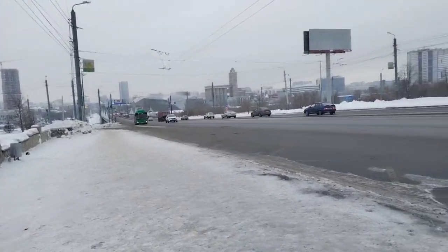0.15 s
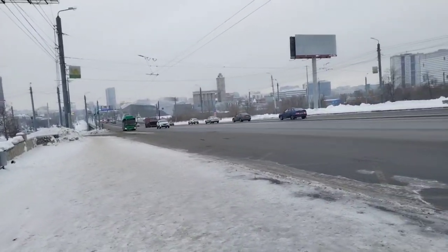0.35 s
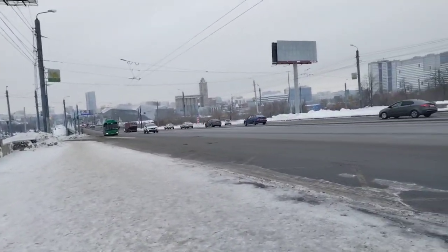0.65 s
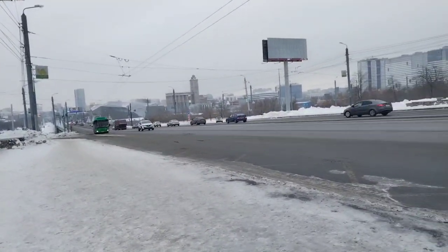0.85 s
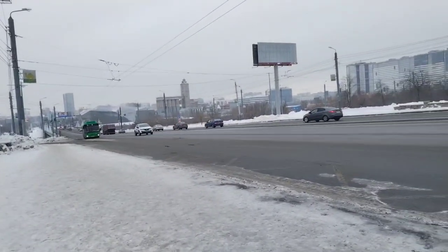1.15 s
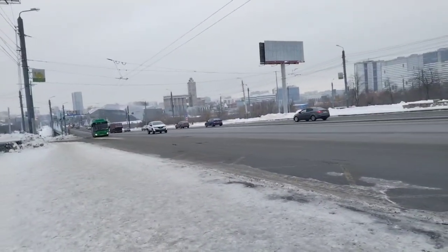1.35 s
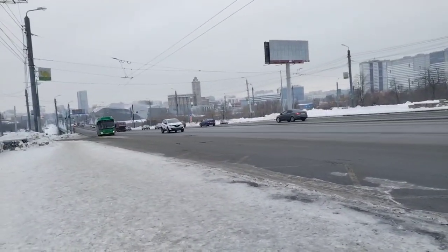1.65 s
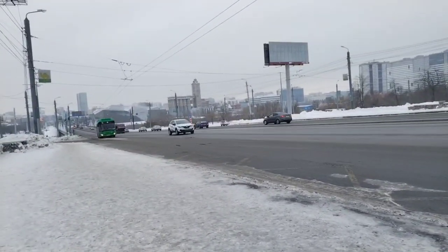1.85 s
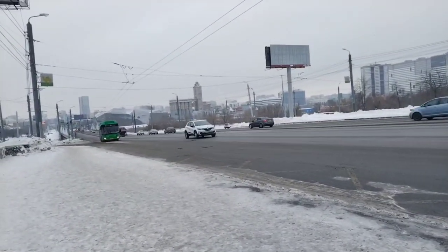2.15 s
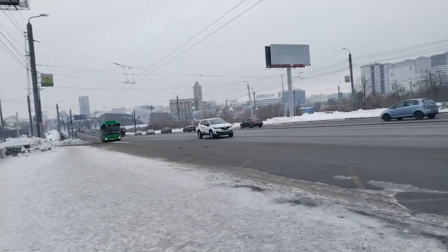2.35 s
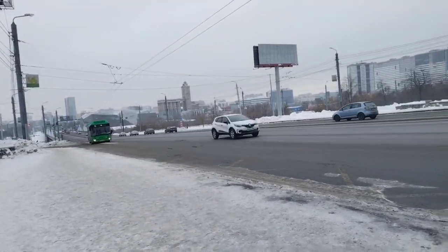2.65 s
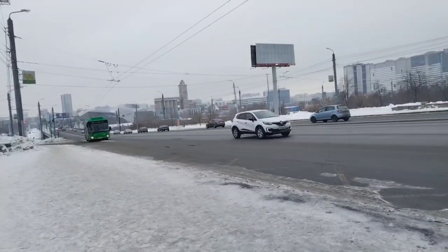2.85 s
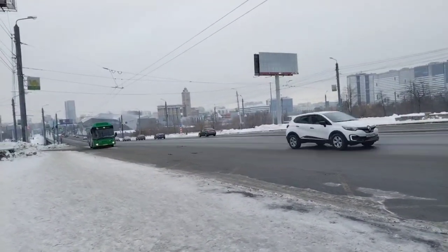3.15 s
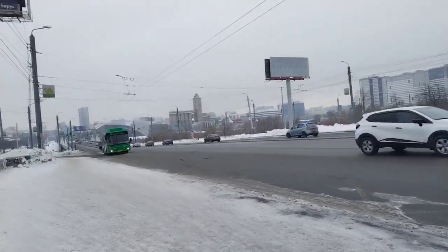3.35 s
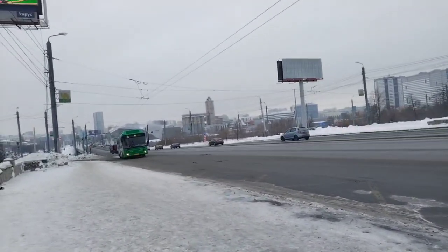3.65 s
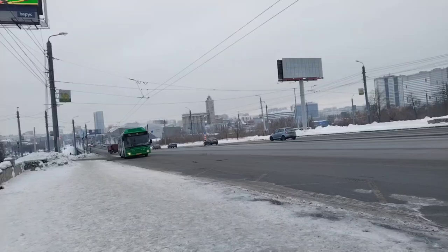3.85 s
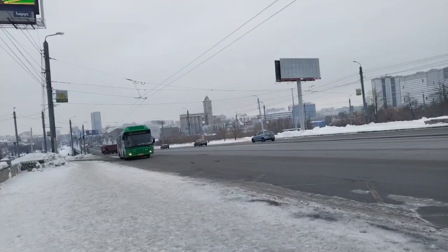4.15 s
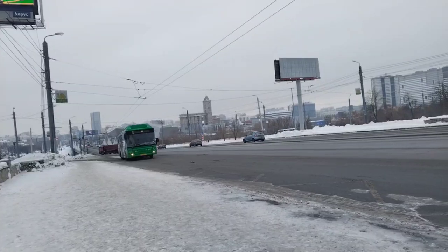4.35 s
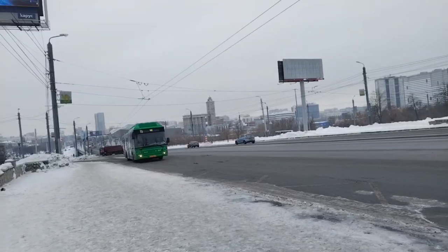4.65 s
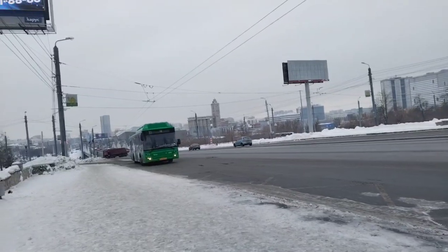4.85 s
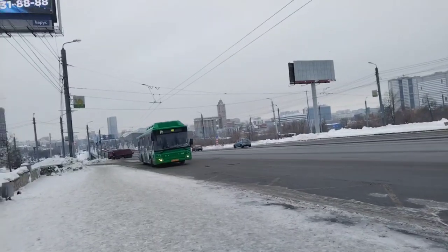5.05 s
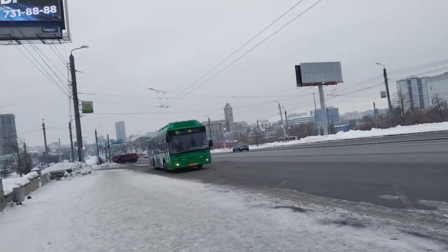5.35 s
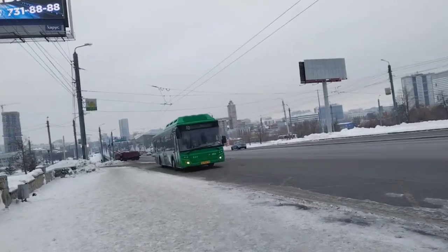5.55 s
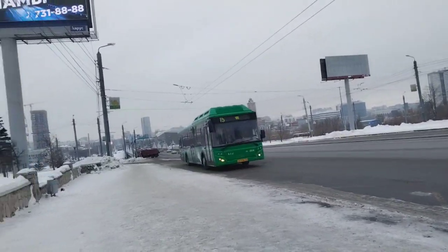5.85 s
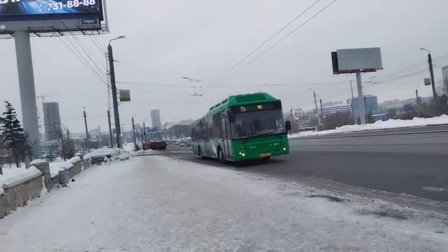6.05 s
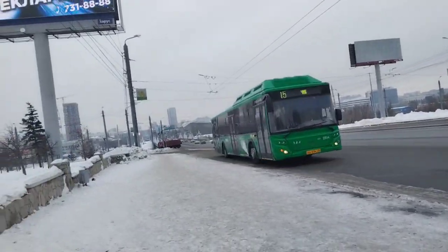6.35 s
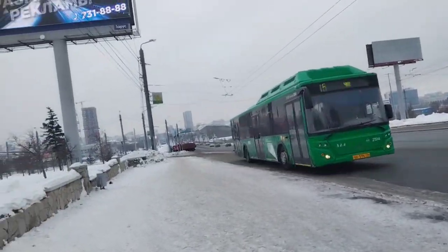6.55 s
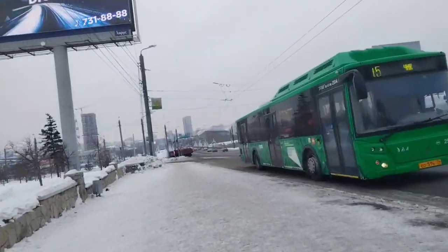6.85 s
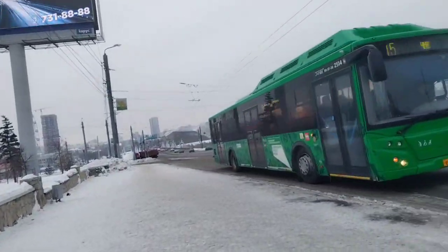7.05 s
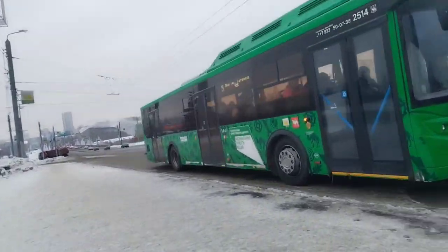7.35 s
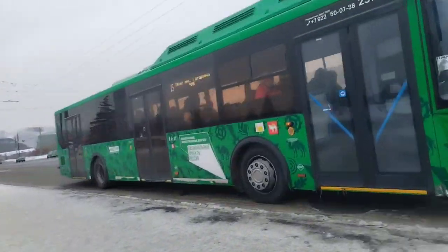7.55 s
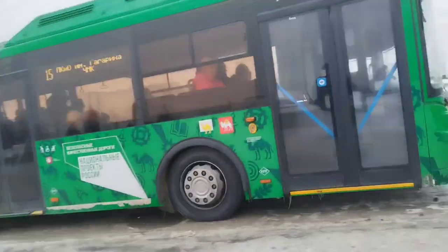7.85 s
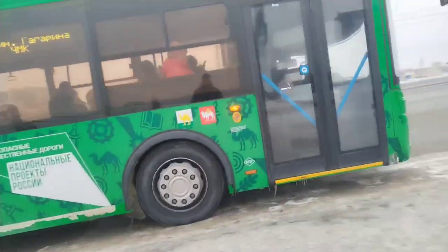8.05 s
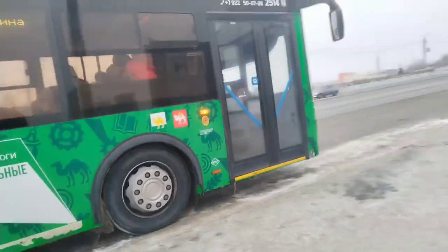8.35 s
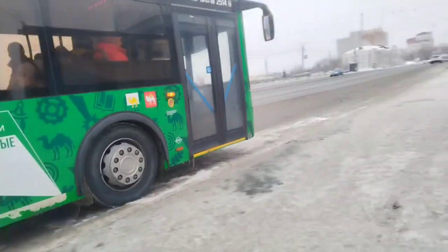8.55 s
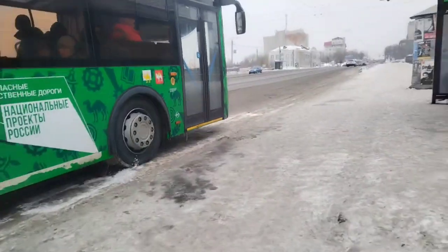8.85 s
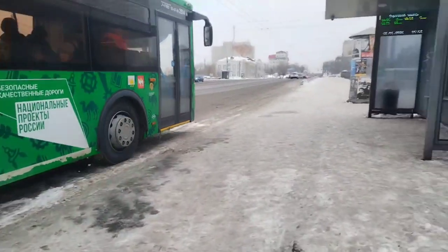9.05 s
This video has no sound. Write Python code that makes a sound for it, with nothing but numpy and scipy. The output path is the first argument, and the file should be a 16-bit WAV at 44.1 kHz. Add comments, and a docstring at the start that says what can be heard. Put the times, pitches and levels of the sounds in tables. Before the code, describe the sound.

Steady traffic hum with low exhaust drone, and tyres hissing on slush. Cars swell and fade, the strongest rush coming near four seconds with snapping grit. The road calms a little while a bus approaches with a wavering hum and diesel rumble; it rolls past very close, slowing, its note falling, with raspy high brake squeals, short chirps, a hidden car's rush behind it and soft air buffets. Open roadside, handheld stereo camera that turns to follow.

```python
"""A car passes at once on a wide, slushy winter road, over a hum of engines and the hiss of wet tyres.
More cars follow and one sweeps past close by: shaped noise makes tyre roar and spray, clicks make grit.
Then a city bus rolls past: wavering tones make its sinking drive note, and tones roughened by noise
its squealing brakes. All is heard from the pavement through the two ports of a hand-held camera."""
import sys
import numpy as np
from scipy import signal
from scipy.fft import rfft, irfft
from scipy.io import wavfile
from scipy.ndimage import uniform_filter1d

SR = 44100
rng = np.random.default_rng(int(sys.argv[2]) if len(sys.argv) > 2 else 0)


def wav_record(signal):
    """Record a signal, one row per channel, as 16-bit PCM in the file named by sys.argv[1]."""
    frames = np.transpose(np.atleast_2d(signal))
    bounded = np.clip(frames, -1, 1)
    # unit amplitude maps onto the largest positive 16-bit level
    quanta = np.round(bounded * 32767).astype(np.int16)
    wavfile.write(sys.argv[1], SR, quanta)


N = 405279
TIME = np.arange(N) / SR
FRAME_S = np.arange(N // 512 + 5) * 512 / SR  # times of the short noise frames
BIN_HZ = np.fft.rfftfreq(2048, 1 / SR)  # pitches within one frame
FINE_HZ = np.fft.rfftfreq(N, 1 / SR)


def amp(db):
    """Decibels to gain."""
    return 10 ** (np.asarray(db) / 20)


def evened(x):
    """Scales to an rms of 1."""
    return x / np.sqrt(np.mean(abs(x) ** 2) + 1e-20)


def read(points, hz, axis=1):
    """One column of a spectrum, joined on a log-frequency axis."""
    table = np.transpose(points)
    return np.interp(np.log(hz + 1), np.log(table[0] + 1), table[axis])


def follow(rows, t):
    """The columns of a curve, read at t."""
    s, *columns = np.transpose(rows)
    return [np.interp(t, s, c) for c in columns]


def shape(points):
    """A spectrum as gains of unit power."""
    return evened(amp(read(points, BIN_HZ)))


def held(t, start, end, rise_s, fall_s):
    """An envelope that grows exponentially up to start, holds until end and dies away."""
    return np.exp(-np.maximum(start - t, 0) / rise_s - np.maximum(t - end, 0) / fall_s)


def flutter(width_hz):
    """Complex noise that wanders within a band of about this width around zero."""
    rate = 3000  # points per second, enough for slow wandering
    hz = np.fft.fftfreq(32768, 1 / rate)
    noise = rng.standard_normal(len(hz)) + 1j * rng.standard_normal(len(hz))
    slow = np.fft.ifft(noise / (1 + (2 * hz / width_hz) ** 2) ** 1.25)
    return evened(np.interp(TIME, np.arange(len(hz)) / rate, slow))


# Bass bends the long way round the camera body.
# Each row: pitch in Hz, stretch of the lag between the ports as a factor.
DETOUR = [(400, 1.17), (800, 1.05), (1300, 1), (1700, 1.005), (3000, 1.02)]


def port_noise(size, likeness, lag_ms=0):
    """Noise at both ports, sized by frame and pitch; the share in common reaches the left port late."""
    a, b, c, d = rng.standard_normal((4, len(FRAME_S), len(BIN_HZ)))
    likeness = np.clip(likeness, -1, 1)
    right = a + 1j * b
    lag_ms = lag_ms * read(DETOUR, BIN_HZ)
    delayed = right * np.exp(-2j * np.pi * BIN_HZ * lag_ms / 1000)
    left = likeness * delayed + np.sqrt(1 - likeness ** 2) * (c + 1j * d)
    field = (np.array([left, right]) * size).swapaxes(1, 2)
    return signal.istft(field, nperseg=2048, noverlap=1536)[1][:, :N] / np.sqrt(2048 / 3)


# How a sound reaches the ports. Each row: degrees to the right of where the camera points,
# lag of the left port in ms before the bass stretch, shade on the left port 0-1 (negative: on the right).
BEARINGS = [(-72, -0.58, -0.36), (-5, -0.0067, 1), (5.5, -0.024, -0.24), (20.5, 0.2, 0.085),
            (31, 0.31, -0.092), (48, 0.48, 0.37), (70.5, 0.59, 0.57), (112, 0.68, 0.91), (159, 0.65, 1)]


def at_ports(bearing):
    """Lag in ms and shade between the ports for a bearing in radians."""
    return follow(BEARINGS, np.degrees(bearing))


# Shadow of the camera body. Each row: pitch in Hz, dB in favour of the right port in full shade.
SHADOW = [(150, 0), (400, 10), (1000, 5.5), (2000, 5), (3300, 19), (5000, 37), (7000, 19), (9000, 16),
          (14000, 42)]


def shaded(shade, notch_hz=2080, notch_sag_hz=290, notch_width_hz=200, notch_db=-6):
    """Gains of both ports: the body screens the left; its reflection notches the right, lower in deep shade."""
    shadow = amp(read(SHADOW, BIN_HZ) * shade)
    away = (BIN_HZ - notch_hz + notch_sag_hz * shade) / notch_width_hz
    notch = amp(notch_db * np.clip(0.63 + shade, 0, 1) / (1 + away ** 2))
    return np.array([np.ones_like(shadow), shadow * notch]) * np.sqrt(2 / (1 + shadow ** 2))


# Where the camera points as it swings round to follow the bus.
# Each row: time in seconds, degrees from the oncoming traffic.
HEADING = [(0, 18), (2.7, 28), (5.5, 33), (7.25, 25.6), (7.5, 64), (8, 88), (8.5, 137), (9.19, 156.5)]


def route(abreast_s, clear_s, screened_s, fade_s, distance_m, speed):
    """A straight drive past: decades of range beyond the nearest point, road angle, camera angle, clear share."""
    t = FRAME_S[:, None]
    angle = np.arctan2(abs(distance_m), speed * (abreast_s - t))
    heading, = follow(HEADING, t)
    clear = held(t, clear_s, screened_s, fade_s, fade_s)
    return -np.log10(np.sin(angle)), angle, angle - np.radians(heading), clear


SPRAY_DB_PER_DECADE, SPRAY_FRONT_DB = 40, 4  # loss with distance, gain of what the camera faces
SPRAY_SCREENING = 0.94  # power of the clear share that dims the spray


def spray_level(row):
    """Spray in dB: it carries only a short way."""
    decades, angle, bearing, clear = route(*row[:6])
    facing_db = SPRAY_FRONT_DB * np.cos(bearing)
    screening_db = SPRAY_SCREENING * 20 * np.log10(clear)
    return row[7] - SPRAY_DB_PER_DECADE * decades + facing_db + screening_db


# Wheels going by, also played by grit and scene: middle-lane car, far-side car, car sweeping past close by,
# car glimpsed beyond the bus, front wheels of the bus, its rear wheels.
# Each row: abreast at seconds, in the clear from seconds, screened from seconds, fade behind others in seconds,
# distance in m, speed in m/s (negative: down the road), then base levels at the nearest point in dB
# of roar, spray, engine and wet hiss, direct share 0-1.
PASSES = [ (0.702, 0, 4.6, 1, 10.8, 9.5, -20, -27.5, -27, -60, 0.67),
          (1.4, 2, 6, .7, 21.7, -20.5, -27.5, -71, -29.5, -83, 0.16),
          (3.931, 2.5, 4.86, 1, 10.9, 13, -20.5, -25, -28.5, -57, 1),
          (7.4, 8.05, 8.21, 0.29, 8, 17.5, -22.5, -24.5, -45, -62, 1),
          (8.001, 5.5, 9.2, .6, 4.5, 3, -36, -67, -31.5, -38.5, 0.41),
          (9.5, 8.5, 9.2, 0.43, 5.5, 2, -30, -25.5, -47, -62, 0.52)]
# Surges of diesel rumble from the bus. Each row: full from seconds, full until seconds, level in dB.
SURGES = [(5.059, 5.7, -34), (7.493, 9.09, -30)]
# Colours of the engines, wet hiss, diesel and brake pads. Each row: pitch in Hz, relative level in dB per Hz.
CITY = [(20, -24), (36, -27), (50, -39), (70, 0.5), (120, 1), (200, 2), (350, -4.5), (600, -2.5),
        (1000, -19), (1500, -8.5), (2500, -37), (4000, -66), (16000, -69)]
WET_HISS = [(1500, -44), (3300, -55), (4300, -12.5), (5700, 8.5), (6800, -7), (8300, 2), (9300, -0.5),
            (10500, -52), (16000, -21)]
DIESEL = [(30, -21), (50, 1), (70, 9.5), (95, 13.5), (130, -3.5), (180, -21), (240, 6), (400, -41),
          (1200, -36), (4000, -81)]
PAD_HISS = [(3000, -50), (8000, -31), (11000, 4.5), (13000, 22), (14000, 6), (15500, -30)]
CITY_DB, WET_HISS_DB = -34, -45  # distant traffic
SURGE_EDGE_S = 0.44
PADS_ON_S, PADS_OFF_S, PADS_DB, PADS_EDGE_S = 6.83, 7.8, -32.5, 0.85  # brake-pad hiss


def street(alike_hz=430, engine_front_db=5.5, shade=0.16):
    """Engines, wet tyres, diesel and pad hiss as wide noise: mostly the bass is alike at both ports."""
    motors, hiss = amp(CITY_DB) ** 2, amp(WET_HISS_DB) ** 2
    for *path, roar_db, spray_db, engine_db, hiss_db, direct in PASSES:
        decades, angle, bearing, clear = route(*path)
        near = clear / 10 ** decades
        motors = motors + (near * amp(engine_db + engine_front_db * np.cos(bearing))) ** 2
        hiss = hiss + (near * amp(hiss_db)) ** 2
    t = FRAME_S[:, None]
    diesel = sum(amp(db) * held(t, start, end, SURGE_EDGE_S, SURGE_EDGE_S) for start, end, db in SURGES) ** 2
    pads = (amp(PADS_DB) * held(t, PADS_ON_S, PADS_OFF_S, PADS_EDGE_S, PADS_EDGE_S)) ** 2
    layers = zip((motors, hiss, diesel, pads), (CITY, WET_HISS, DIESEL, PAD_HISS))
    power = sum(level * shape(colour) ** 2 for level, colour in layers)
    return port_noise(np.sqrt(power) * shaded(shade)[:, None], 1 / (1 + (BIN_HZ / alike_hz) ** 2.0))


def unevenness(size=(12, 14)):
    """Slow random unevenness of the roar over time and pitch."""
    noise = rng.standard_normal((len(FRAME_S), len(BIN_HZ)))
    over_time = uniform_filter1d(noise, size[0], 0)
    return evened(uniform_filter1d(over_time, size[1], 1))


# Colours of tyre roar and spray. Each row: pitch in Hz, relative level in dB per Hz.
TYRES = [(40, -37), (120, -5.5), (230, -1.5), (370, -3.5), (600, 0.5), (950, 3.5), (1400, -3), (2000, -4.5),
         (2600, -17.5), (3300, -35), (4300, -54), (6000, -31), (8200, -26), (10500, -60), (16000, -58)]
SPRAY = [(200, -17), (800, 2), (1400, 2), (2300, -0.5), (3200, -5), (4300, -7), (5800, -6.5), (8200, -8),
         (10500, 1.5), (16000, -12.5)]
# The wedge between tread and road beams the roar along the lane.
# Each row: pitch in Hz, gain ahead in dB, gain behind in dB.
BEAM = [(150, -0.5, 4), (550, 4.5, 2.5), (840, 3.5, -2), (1250, 8, 4.5), (1960, 6.5, 6), (3000, 9, 10),
        (4400, 0, 3), (8000, 11, 4)]
ROAR_DB_PER_DECADE, ROAR_FRONT_DB = 26.5, 5.5  # loss with distance, gain of what the camera faces
SLUSH_SPEED, SLUSH_DULL_DB = 13, 18  # below this speed in m/s a wheel squeezes out slush, not fine spray


def vehicle(row, direct_hz=3800, spatter_db=2.0, near_db=-24, uneven_db=1.2):
    """Tyre roar and spray from a moving point: lag and shadow between the ports follow its bearing."""
    decades, angle, bearing, clear = route(*row[:6])
    beam = np.where(angle < np.pi / 2, read(BEAM, BIN_HZ, axis=1), read(BEAM, BIN_HZ, axis=2))
    beam_db = beam * np.cos(angle) ** 2
    roar_db = row[6] - ROAR_DB_PER_DECADE * decades + ROAR_FRONT_DB * np.cos(bearing)
    roar_db = roar_db + beam_db + uneven_db * unevenness()
    spray_db, direct = spray_level(row), row[10]
    lag_ms, shade = at_ports(bearing)
    spatter = spatter_db * rng.standard_normal((len(FRAME_S), 1))  # slush leaves the tread in clumps
    slush_db = SLUSH_DULL_DB * max(1 - abs(row[5]) / SLUSH_SPEED, 0)
    # slow or far spray is duller
    dull_db = (slush_db + np.maximum(near_db - spray_db, 0)) * np.minimum(BIN_HZ / 11000, 1) ** 4
    roar = clear * amp(roar_db) * shape(TYRES)
    spray = amp(spray_db + spatter - dull_db) * shape(SPRAY)
    likeness = direct / (1 + (BIN_HZ / direct_hz) ** 6)  # treble arrives more scattered
    return port_noise(np.hypot(roar, spray) * shaded(shade), likeness, lag_ms)


# Bands of traffic noise that bloom and fade. Each row: full from seconds, full until seconds,
# centre in Hz, width in Hz, level in dB, lag of the left port in ms before the bass stretch.
SWISHES = [(.1, .3, 1500, 1500, -32, .42), (.8, 1.02, 1500, 520, -33, .58),
           (2.55, 3.05, 1150, 1100, -28.5, .03), (3.1, 3.55, 540, 320, -28.5, .22),
           (3.47, 3.78, 2300, 700, -29.5, .43), (3.7, 3.92, 550, 240, -28.5, .36),
           (4.33, 4.52, 1180, 400, -30, .64), (6.22, 6.48, 2450, 500, -48, .1),
           (7.4, 7.7, 1250, 600, -38, .6), (8.12, 8.27, 2250, 700, -32.5, .44),
           (8.3, 8.46, 900, 800, -35, .15), (8.48, 8.8, 1700, 240, -35, .05),
           (8.92, 9.03, 900, 700, -33, -.2)]
SWISH_RISE_S, SWISH_FALL_S = .09, .05


def swishes(likeness=1.0, shade=0.14):
    """Bands of traffic noise that bloom and fade, each with its own lag between the ports."""
    power, lag = 1e-20, 0
    for start, end, hz, width_hz, db, lag_ms in SWISHES:
        band = evened(1 / (1 + (2 * (BIN_HZ - hz) / width_hz) ** 4))
        envelope = held(FRAME_S[:, None], start, end, SWISH_RISE_S, SWISH_FALL_S)
        swell = (amp(db) * envelope * band) ** 2
        power, lag = power + swell, lag + swell * lag_ms
    return port_noise(np.sqrt(power) * shaded(shade)[:, None], likeness, lag / power)


def snap(hz, ring_s):
    """A grain cracks: a brief ring, then a trace of scattered sound."""
    t = np.arange(600) / SR
    ring = np.cos(2 * np.pi * hz * t) * t / ring_s * np.exp(1 - t / ring_s)
    return ring + 0.014 * rng.standard_normal(len(t)) * np.exp(-t / 0.0039)


# Grit snapping under the tyres, and at 7.389 s a single click of the bus's brake pad. # Each row: start in
# seconds, level in dB before the port gains, pitch in Hz, ring in seconds.
SNAPS = [(0.775, -15, 3900, .00015), (3.562, -13, 4000, .00011), (3.768, -8, 4500, .00011),
         (3.827, -13, 5500, .00015), (3.855, -16, 5500, .00015), (3.981, -15, 5500, .00015),
         (4.126, -15, 5900, .00015), (4.171, -11, 5400, .00016), (7.389, -19, 4300, .00018),
         (8.573, -12.5, 5150, .00032), (8.5765, -11, 6500, .00022), (8.804, -16, 5200, .00028),
         (8.993, -20, 6000, .0002)]


def grit(ring_s=0.00013, left_db=-3, crackle_db=-20, per_s=260):
    """Single stones snap under the tyres, a brake pad clicks once, and finer grains crackle along with the
    spray."""
    clicks = np.zeros(N + SR)
    for s, db, hz, stone_ring_s in SNAPS:
        sound = amp(db) * snap(hz, stone_ring_s)
        clicks[round(s * SR):][:len(sound)] += sound
    spray = np.interp(TIME, FRAME_S, sum(amp(spray_level(row)) for row in PASSES)[:, 0])
    grain_sizes = amp(4.2 * np.minimum(rng.exponential(1, N), 4))
    grains = grain_sizes * (rng.random(N) < per_s / SR)
    crackle = evened(signal.oaconvolve(grains, snap(5800, ring_s))[:N])
    return (clicks[:N] + amp(crackle_db) * spray * crackle) * amp([[left_db], [0]])


# Colour of the two ports. Each row: pitch in Hz, left gain in dB, right gain in dB.
PORTS = [(300, 0.5, 0), (980, 1.5, -1.55), (1860, -3, 3), (2680, -3, 4), (3770, -5, 3.5), (4680, -2, -1),
         (4820, -10, 3), (6100, -15, 6.5), (6620, -1, 1.5), (8160, 8.5, -13.5), (8910, 2.5, -28),
         (9940, -15, -35.5), (14500, -8.5, -10.5)]


def through_ports(x):
    """Each port's duct has its own treble resonance."""
    colour = amp([read(PORTS, FINE_HZ, axis=1), read(PORTS, FINE_HZ, axis=2)])
    return irfft(rfft(x) * colour, N)


# The slipstream of the bus buffets the ports.
# Each row: middle in seconds, level in dB before filter and port gain, spread in seconds.
BUFFETS = [(8.872, -12, 0.017), (8.94, -18, .012), (8.985, -14.5, 0.0083), (9.048, -20, .007),
           (9.082, -21, 0.012)]


def slipstream(centre_hz=130, left_db=-7):
    """Short eddies thump each port separately."""
    size = sum(amp(db) * np.exp(-((TIME - s) / length) ** 2 / 2) for s, db, length in BUFFETS)
    carrier = np.exp(2j * np.pi * centre_hz * TIME)
    eddies = np.array([(flutter(264) * carrier).real for port in range(2)])
    bass_cut = signal.butter(4, 55, "high", fs=SR, output="sos")
    thumps = signal.sosfilt(bass_cut, size * evened(eddies))
    return thumps * amp([[left_db], [0]])


NOTE_EDGE_S = 0.13


def engine_note(start, end, hz, db, rough, width_hz, octave_db):
    """A low engine order with its octave, wavering as the load changes."""
    turn = 2 * np.pi * np.cumsum(hz) / SR
    note = (np.exp(1j * turn) + amp(octave_db) * np.exp(2j * turn)) * (1 + rough * flutter(width_hz))
    return amp(db) * evened(note.real) * held(TIME, start, end, NOTE_EDGE_S, NOTE_EDGE_S)


# The bus drive speeds up, coasts and brakes. Each row: time in seconds, pitch in Hz, level in dB.
DRIVE = [(3.45, 144.5, -30), (3.8, 151, -31), (4.05, 151, -41), (4.35, 153.5, -32), (4.8, 163, -35.5),
         (5.02, 173.4, -31.5), (5.35, 169, -31), (5.47, 166, -37), (5.6, 164, -30), (5.95, 160, -31),
         (6.1, 157.3, -35), (6.35, 151.5, -30), (6.55, 145, -35), (6.8, 139, -32.5), (7.1, 132, -31.5),
         (7.45, 123, -28), (8, 108, -35), (8.6, 97, -34), (9.19, 84, -35)]
# Deep exhaust drones, each sagging in pitch. Each row: full from seconds, full until seconds,
# first pitch in Hz, sag in Hz per second, first level in dB, swell in dB per second.
DRONES = [(0, 4.9, 57, 1.2, -38, .9), (5.62, 7.6, 62, 7.7, -30.5, -7.5), (8, 9.19, 54, 8.3, -41, -4)]
DRIVE_ROUGH, DRIVE_WAVER_HZ = .29, 1.6


def engines():
    """The note of the bus drive over the exhaust drones."""
    drive_hz, drive_db = follow(DRIVE, TIME)
    drive_hz = drive_hz + DRIVE_WAVER_HZ * flutter(10.03).real
    out = engine_note(DRIVE[0][0], DRIVE[-1][0], drive_hz, drive_db,
                      rough=DRIVE_ROUGH, width_hz=14, octave_db=-14)
    for start, end, hz, sag, db, swell in DRONES:
        age = np.clip(TIME, start, end) - start
        out = out + engine_note(start, end, hz - sag * age, db + swell * age,
                                rough=.15, width_hz=8, octave_db=-11)
    return out


# Short chirps of a dragging pad. Each row: full from seconds, full until seconds, first pitch in Hz,
# rise in Hz per second, level in dB before roughness and port gain.
CHIRPS = [(7.34, 7.52, 6120, -300, -41), (7.7, 7.725, 6080, 2000, -38), (7.83, 7.86, 5500, 0, -38),
          (7.87, 7.91, 5720, 1500, -39), (7.93, 7.98, 6020, -1000, -36), (8.09, 8.16, 5540, 0, -40),
          (8.18, 8.22, 5680, 2500, -37), (8.2, 8.33, 6240, 0, -40), (8.37, 8.48, 6210, 600, -36),
          (8.52, 8.55, 5600, -2000, -38), (8.745, 8.775, 6020, 2500, -32.5), (8.83, 8.88, 5700, 2000, -39),
          (8.945, 8.99, 6060, 1200, -33), (9, 9.05, 6240, 0, -36.5)]
CHIRP_EDGE_S, CHIRP_LEFT_DB = .012, -1


def chirps():
    """A dragging pad slips in short, wavering chirps that hop between neighbouring modes."""
    out = np.zeros((2, N))
    waver_hz = 45 * flutter(60).real
    grain = np.array([1j ** port + .7 * flutter(150) for port in range(2)])
    for start, end, hz, rise, db in CHIRPS:
        near = abs(TIME - start) < .5
        t = TIME[near]
        pitch_hz = hz + rise * (np.clip(t, start, end) - start) + waver_hz[near]
        tone = grain[:, near] * np.exp(2j * np.pi * np.cumsum(pitch_hz) / SR)
        out[:, near] += amp(db) * held(t, start, end, CHIRP_EDGE_S, CHIRP_EDGE_S) * tone.real
    return out * amp([[CHIRP_LEFT_DB], [0]])


# Each time a pad catches. Each row: voice, full from seconds, full until seconds,
# level in dB before the mode's trim, left minus right in dB.
SQUEALS = [ ("first", 5.89, 6.02, -30.5, 24), ("first", 6.17, 6.26, -28, 19),
           ("first", 6.3, 6.335, -21.5, 17), ("top", 6.73, 8.1, -44.5, 0), ("top", 7.08, 7.72, -39.5, -2),
           ("top", 8.48, 8.59, -38, 12), ("high", 7.39, 8.15, -27.5, 3), ("high", 8.19, 8.42, -25, 7),
           ("high", 8.48, 8.54, -21, 17), ("middle", 7.31, 7.39, -44, 4), ("middle", 7.77, 8.58, -31.5, 17),
           ("middle", 8.76, 8.84, -34, 8), ("middle", 9.11, 9.19, -27, 18), ("low", 8.28, 8.32, -33, 20),
           ("low", 8.43, 8.58, -26.5, 18), ("last", 8.55, 8.65, -34, 2), ("last", 8.715, 8.75, -19.5, 16),
           ("last", 8.82, 8.87, -21, 13), ("last", 8.98, 9.03, -20, 13), ("last", 9.14, 9.19, -21, 14),
           ("whine", 7.68, 7.95, -46.5, -3), ("whine", 8.02, 8.08, -48.5, -4), ("rub", 5.4, 6.65, -52, -16)]
# Brake modes at rest, before the Doppler glide. Each row: voice, pitch in Hz, width of its chatter in Hz,
# wander in Hz, share of pure tone 0-1, trim in dB.
BRAKE_MODES = [("first", 7622, 250, 30, .25, -1), ("top", 13064, 230, 25, .15, 0),
               ("high", 11798, 190, 10, .4, 0), ("middle", 9375, 200, 16, .2, 0),
               ("low", 7728, 150, 10, .3, 0), ("last", 10530, 180, 30, .6, 0),
               ("last", 10766, 170, 20, .1, -13), ("whine", 3712, 150, 7, .62, 0),
               ("rub", 3400, 800, 30, 0, 0)]
SQUEAL_RISE_S, SQUEAL_FALL_S = 0.062, 0.046
GLIDE, GLIDE_MID_S, GLIDE_S = .048, 7.68, .85  # pitch drop as a fraction, its middle and its pace


def brakes(skirt_db=-21, skirt_width_hz=600):
    """Pads drive the brake modes: a pure tone inside a band of stick-slip chatter, all on one Doppler glide."""
    doppler = 1 + GLIDE * (1 - np.tanh((TIME - GLIDE_MID_S) / GLIDE_S)) / 2
    out = np.zeros((2, N))
    rasp = amp(skirt_db) * flutter(skirt_width_hz)
    for voice, hz, width_hz, wander_hz, pure, trim_db in BRAKE_MODES:
        sizes = np.zeros((2, N))
        for name, start, end, db, pan_db in SQUEALS:
            if name == voice:
                sides = 2 * evened(amp([[pan_db], [0]]))
                envelope = held(TIME, start, end, SQUEAL_RISE_S, SQUEAL_FALL_S)
                sizes = np.hypot(sizes, sides * amp(db + trim_db) * envelope)
        pitch_hz = hz * doppler + wander_hz * flutter(26.0).real
        tone = np.exp(2j * np.pi * np.cumsum(pitch_hz) / SR)
        for port, size in enumerate(sizes):  # each port gets its own mix of reflections
            chatter = np.sqrt(1 - pure) * flutter(width_hz)
            out[port] += size * (tone * (1j ** port * np.sqrt(pure) + chatter + rasp)).real
    return out


def scene():
    """Traffic, then the bus with its engine, brakes and wake."""
    tyres = sum(vehicle(row) for row in PASSES)
    road = through_ports(street() + tyres + swishes() + grit())
    return road + slipstream() + engines() + chirps() + brakes()


EDGE_HZ = 15900


def record(dry):
    """The band limit of the camera: a steep filter removes the highest treble."""
    low_pass = signal.firwin(511, EDGE_HZ, window=("kaiser", 9), fs=SR)
    return signal.oaconvolve(dry, low_pass[None], "same")


dry = scene()
out = record(dry)
wav_record(out)
```